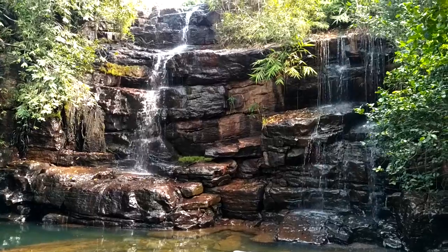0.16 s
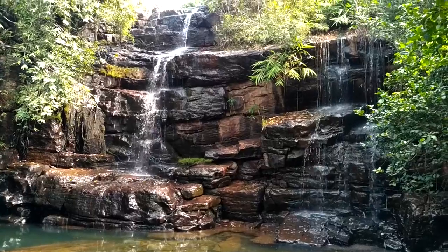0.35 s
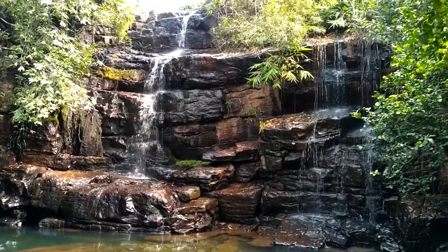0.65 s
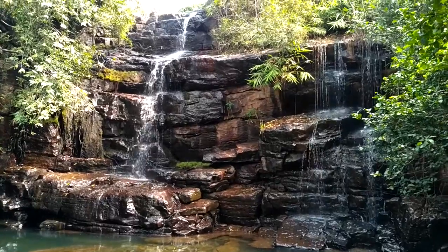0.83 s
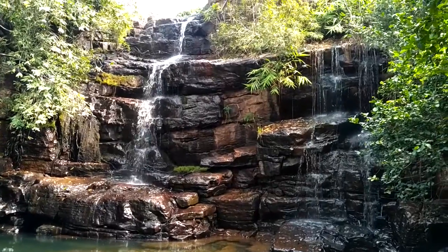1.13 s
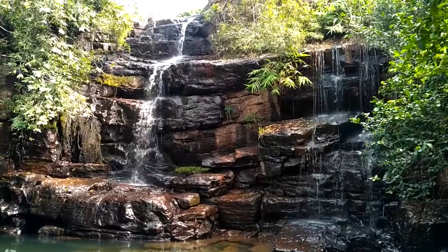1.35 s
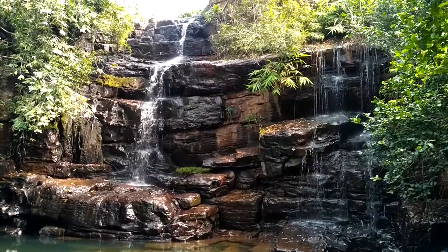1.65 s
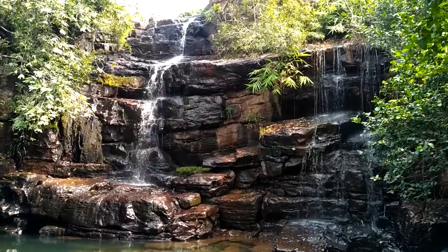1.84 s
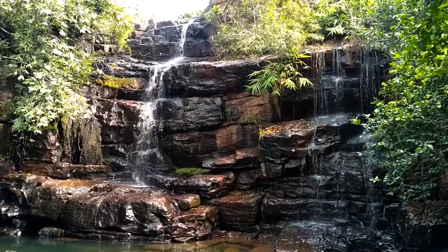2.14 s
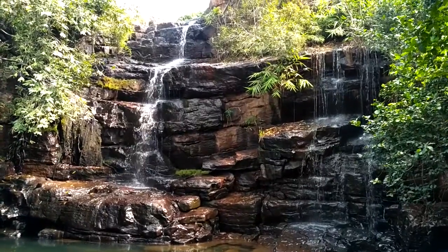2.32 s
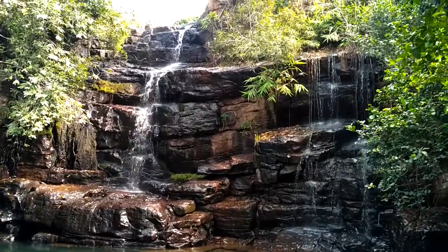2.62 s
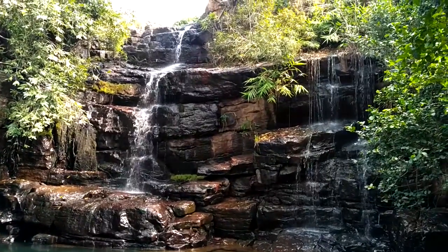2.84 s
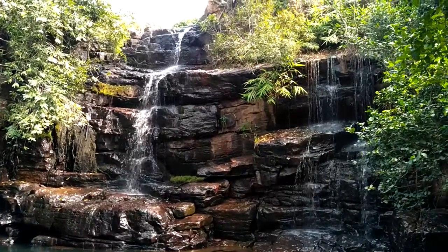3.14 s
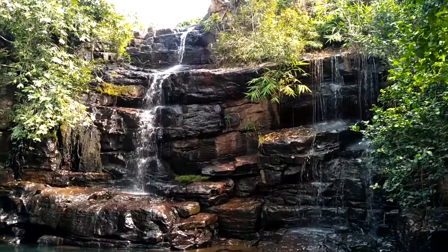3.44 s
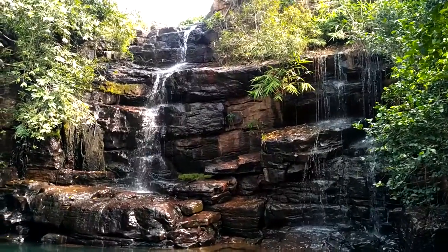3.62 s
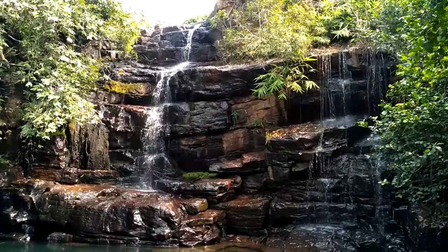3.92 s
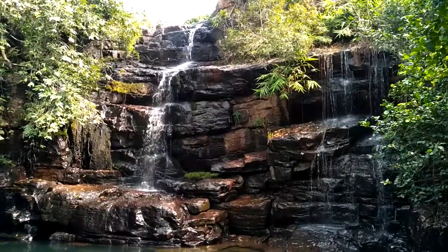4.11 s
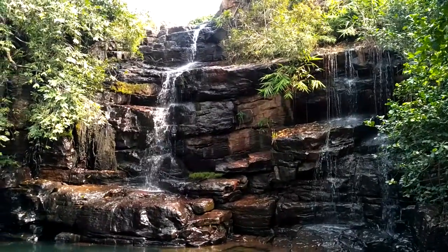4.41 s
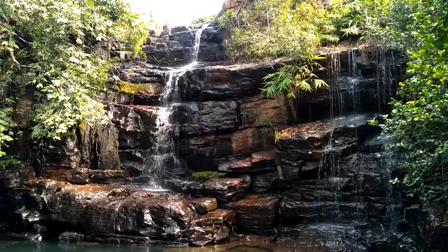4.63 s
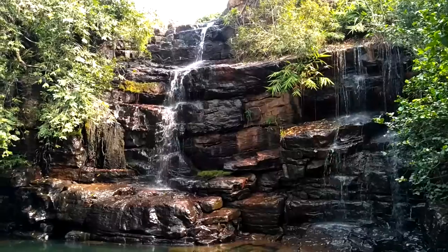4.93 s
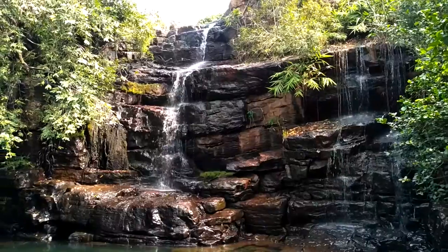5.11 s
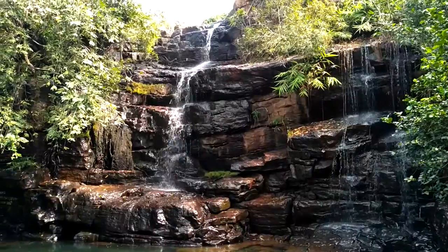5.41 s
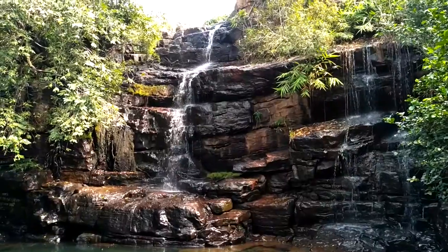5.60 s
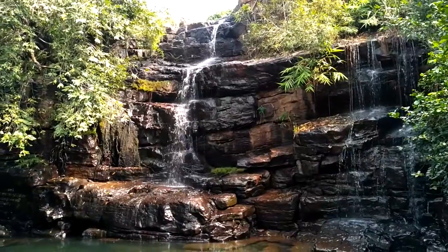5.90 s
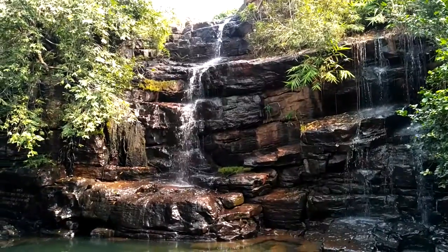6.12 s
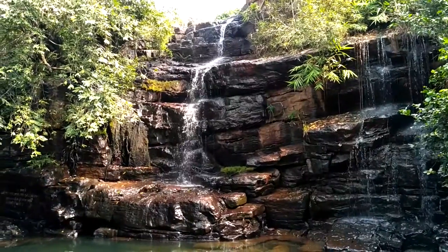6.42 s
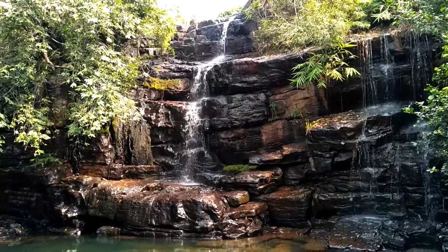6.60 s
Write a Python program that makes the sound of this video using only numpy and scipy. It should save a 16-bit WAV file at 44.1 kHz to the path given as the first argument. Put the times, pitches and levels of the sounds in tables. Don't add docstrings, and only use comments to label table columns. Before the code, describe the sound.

A small waterfall breaks on rock ledges into a pool, heard across the water by a thin, bright mono microphone. Dense spray hiss fades in quickly, then at about half a second sinks to a faint whisper with barely audible splats and plops. Around 4.4 seconds the level jumps back to full, revealing hard drop clicks on near stone, side-trickle gurgles, bubbles and soft wind bumps.

```python
import sys
import numpy as np
from scipy import signal
from scipy.fft import rfft, irfft, next_fast_len
from scipy.io import wavfile
from scipy.ndimage import uniform_filter1d

SR = 44100
rng = np.random.default_rng(int(sys.argv[2]) if len(sys.argv) > 2 else 0)


def log_audio(samples):
    frames = np.atleast_2d(samples).T
    limited = np.clip(frames, -1, 1)
    pcm = np.round(limited * 32767).astype(np.int16)
    wavfile.write(sys.argv[1], SR, pcm)


def invert_db(x):
    u = np.asarray(x, float) / 20
    return 10 ** u


N = 297675


def unit(x):
    return x / np.sqrt(np.mean(x ** 2) + 1e-20)


def curve(rows):
    seconds, values = np.transpose(rows)
    return np.interp(np.arange(N) / SR, seconds, values)


def filtered(x, response):
    size = next_fast_len(len(x) + 8192)
    hz = np.fft.rfftfreq(size, 1 / SR)
    return irfft(rfft(x, size) * response(hz), size)[:len(x)]


def coloured(x, spectrum):
    points_hz, points_db = np.transpose(spectrum)
    return unit(filtered(x, lambda hz: invert_db(np.interp(np.log(hz + 1), np.log(points_hz), points_db))))


# centre in Hz, width in Hz, lift in dB.
HOUSING = [(1690, 166, 6.5), (2463, 260, 3.5), (3500, 310, 4), (4534, 120, 4.5), (11240, 1260, 4)]


def housing(hz):
    return invert_db(sum(lift_db * np.exp(-((hz - centre) / width) ** 2) for centre, width, lift_db in HOUSING))


def patchy(patch_db, surge_db, bins, fade, even_hz):
    hz, _, cells = signal.stft(rng.standard_normal(N + 2 * 256), SR, nperseg=256)
    patches = uniform_filter1d(rng.standard_normal(cells.shape), bins, 0)
    kicks = np.vstack([patches, rng.standard_normal(cells.shape[1])])
    kicks = kicks / kicks.std(1, keepdims=True)
    kicks = np.maximum(kicks - 0.8, 0) ** 2
    field = signal.lfilter([1], [1, -fade], kicks - kicks.mean())
    field = np.tanh(field / field.std() / 3) * 3
    depth_db = patch_db / np.sqrt(1 + (hz[:, None] / even_hz) ** 2)
    gain_db = depth_db * field[:-1] + surge_db * field[-1]
    return signal.istft(cells * invert_db(gain_db), SR, nperseg=256)[1][:N]


def droplets(count, centre_hz, octaves, cycles, scatter_db):
    start = (rng.random(count) * N).astype(int)
    size = invert_db(scatter_db * np.minimum(rng.exponential(size=count), 3.5))
    hz = centre_hz * 2 ** (octaves * rng.standard_normal(count))
    hz = np.clip(hz, centre_hz / 4, SR / 3)
    turns = hz[:, None] * np.arange(512) / SR
    ring = np.sin(2 * np.pi * turns * (1 + 0.095 * turns / cycles))
    envelope = np.exp(-turns / cycles) * (1 - np.exp(-turns))
    grains = size[:, None] * ring * envelope
    at = start[:, None] + np.arange(512)
    return np.bincount(at.ravel(), grains.ravel(), N + 512)[:N]


def bursts(rows, width, edge, fall, extra_db):
    out = np.zeros(N + 2 * SR)
    for s, hz, db, ms in rows:
        span = next_fast_len(round(ms * SR / 200))
        f = np.fft.rfftfreq(span, 1 / SR)
        response = housing(f) * np.exp(-(np.log2((f + 1) / hz) / width) ** 2)
        band = irfft(rfft(rng.standard_normal(span)) * response, span)
        u = np.arange(span) / (ms * SR / 1000)
        fade_out = 1 - np.arange(span) / span
        burst = band * np.tanh(u / edge) / (1 + u ** fall) * fade_out
        loudness = np.sqrt(np.mean(burst[u < 1] ** 2))
        out[round(s * SR):][:span] += invert_db(db + extra_db) * burst / loudness
    return out[:N]


# time in seconds, level in dB.
WIND = [(0, -76), (1, -79.5), (2, -78.5), (3, -73), (3.5, -82), (4, -83), (4.5, -75.5), (5.4, -78.5),
        (6.4, -69), (6.75, -77)]
# frequency in Hz, level in dB.
RUMBLE = [(15, -47), (30, -16), (60, -4), (120, -0.5), (170, -5), (300, -58), (600, -120)]
# start in seconds, centre in Hz, peak in dB, length in ms.
BUMPS = [(3.003, 107, -58, 120), (3.772, 126, -58, 190), (4.0, 124, -61, 59), (5.0, 117, -63, 70),
         (5.12, 121, -64, 38), (5.36, 70, -66, 80), (5.43, 117, -58, 60), (6.05, 80.6, -64, 52),
         (6.26, 113, -66, 50), (6.36, 110, -63, 100), (6.45, 70, -67, 34), (6.56, 90, -67, 77),
         (4.65, 120, -67, 40), (3.55, 160, -67, 110)]


def wind():
    gusts = patchy(0.1, 2.2, bins=1, fade=0.85, even_hz=500)
    rumble = invert_db(curve(WIND)) * coloured(gusts, RUMBLE)
    return rumble + bursts(BUMPS, width=0.34, edge=0.13, fall=2.9, extra_db=-3.5)


# start in seconds, centre in Hz, peak in dB.
TRICKLES = [(2.333, 383, -55), (2.676, 1900, -43), (2.737, 1700, -44.5), (2.89, 950, -52),
            (3.105, 270, -56), (3.763, 151, -62), (4.241, 850, -48.5), (4.411, 1300, -50),
            (4.527, 680, -59), (4.574, 604, -58), (4.695, 6050, -39), (4.76, 6210, -39), (4.801, 1900, -47),
            (4.95, 4280, -42), (5.016, 6100, -37), (5.086, 2130, -44), (5.125, 2420, -45),
            (5.16, 1900, -45), (5.164, 3780, -42.5), (5.273, 3070, -43), (5.463, 212, -59),
            (5.684, 350, -54), (5.689, 1900, -44), (5.801, 3020, -45), (6.131, 3100, -43),
            (6.257, 1080, -55), (6.264, 2200, -47), (6.517, 3930, -38), (6.53, 880, -55.5),
            (6.57, 2770, -42)]


def gurgles(count):
    when, where, size = rng.random((count, 3)).T
    hz = 441 * 2 ** (3.99 * where)
    faint_db = -56 + 5 * np.log2(hz / 1000)
    faint_db = faint_db + 2.5 * (2 * size - 1)
    rows = TRICKLES + list(zip(when * N / SR, hz, faint_db))
    return [(s, f, db, 16.3 * (1000 / f) ** 0.25) for s, f, db in rows]


# start in
# seconds, centre in Hz, peak in dB, length in ms.
SOFT_RUSHES = [(.65, 1810, -46, 30), (1.25, 2100, -45, 37), (1.49, 1600, -52, 30), (1.53, 2140, -54, 23),
               (1.565, 2600, -47, 25), (5.7, 296, -59.5, 70), (5.8, 280, -61.5, 63), (2.69, 1570, -52, 20),
               (3.4, 1750, -43, 17), (3.505, 1700, -45, 16), (3.835, 1690, -44, 18), (3.921, 1540, -51, 18),
               (4.925, 2370, -44, 20), (5.478, 4000, -41, 16), (5.88, 3600, -39, 7.8), (5.91, 3500, -45.5, 35),
               (5.909, 1500, -48, 15), (6.05, 1740, -45, 33), (6.296, 2490, -43.5, 31)]


def trickles():
    return bursts(SOFT_RUSHES + gurgles(count=70), width=0.33, edge=0.17, fall=1.0, extra_db=-4.5)


# start in seconds, peak in dB, length in ms.
HOLLOW = [
    (3.388, -42, 13),
    (4.107, -45, 15),
    (4.243, -28.5, 11),
    (4.709, -40, 14),
    (4.874, -47, 27),
    (4.902, -45.5, 27),
    (6.067, -45, 9.3),
    (6.095, -45.5, 10),
]
# start in seconds, pitch in Hz, peak in dB.
PLOPS = [(.73, 1520, -47), (.936, 1000, -50.5), (1.191, 1340, -45), (1.197, 624, -61), (1.239, 1350, -49),
         (1.458, 1260, -51), (1.711, 1134, -50), (2.095, 1080, -53), (2.135, 1220, -54), (2.516, 940, -51),
         (2.859, 950, -56), (2.942, 990, -52), (3.505, 1140, -54), (3.786, 854, -55.5), (4.001, 1000, -53),
         (4.322, 714, -58), (4.468, 634, -59), (4.653, 1105, -53), (4.748, 1910, -43.5), (4.827, 594, -69),
         (5.014, 810, -58), (5.331, 700, -56), (5.388, 796, -54.5), (5.681, 1080, -54.5),
         (5.822, 1836, -42.5), (5.879, 1380, -49), (5.93, 790, -53), (6.171, 2240, -47.5)]
# start in seconds, pitch in Hz, peak in dB, length in ms.
GLUGS = [(2.74, 424, -58, 18), (2.858, 196, -62, 67), (3.178, 334, -48, 16), (3.466, 382, -55, 24),
         (3.833, 420, -60, 31), (4.798, 360, -60, 23), (4.912, 380, -57, 21), (5.938, 303, -56.5, 31),
         (6.177, 300, -56.5, 41), (6.27, 457, -58.5, 25), (6.677, 299, -52.5, 115)]


def bubbles():
    hollow = [(s, 1740, db, ms) for s, db, ms in HOLLOW]
    plain = [(s, hz, db, 15.8) for s, hz, db in PLOPS]
    return hollow + plain + GLUGS


def plops():
    out, t = np.zeros(N + SR), np.arange(SR // 5) / SR
    for s, hz, db, ms in bubbles():
        u = t / (ms / 1000 * 0.19)
        swell = u ** 2 * np.exp(2 - 2 * u)
        ring = np.sin(2 * np.pi * hz * t * (0.963 + 0.0087 * u))
        out[round(s * SR):][:len(t)] += invert_db(db + 4) * swell * ring
    return out[:N]


def froth():
    return bursts(bubbles(), width=0.23, edge=0.33, fall=2.3, extra_db=-5.5)


# delay in seconds, level in dB.
LEDGES = [(.0055, -11.5), (.011, -10), (.019, -5.5), (.032, -13), (.045, -16), (.061, -19)]


def ledges(x):
    return x + sum(invert_db(db) * np.pad(x, (round(s * SR), 0))[:N] for s, db in LEDGES)


# start in seconds, centre in Hz, peak in dB, length in ms.
SPLATS = [(.21, 6100, -32.5, 8.4), (.862, 4420, -35, 9), (.997, 3470, -40, 13), (1.189, 2840, -35.5, 23),
          (1.202, 5530, -35.5, 23), (1.248, 3690, -37, 9.8), (1.598, 2800, -34.5, 9),
          (2.143, 5300, -34.5, 30), (3.175, 5960, -39, 18), (3.782, 5430, -40, 19), (3.844, 2860, -37, 17),
          (3.915, 4650, -34.5, 14), (4.41, 4680, -36.5, 7.3), (4.412, 2250, -40, 20),
          (4.539, 4270, -38, 15), (4.612, 6460, -31, 13), (4.8, 6500, -36, 16), (5.098, 5560, -34.5, 11),
          (5.467, 3700, -33.5, 14), (5.589, 3940, -34.5, 11), (5.719, 2800, -39.5, 10),
          (5.774, 5170, -36.5, 9.7), (5.88, 2820, -36.5, 27), (5.978, 2630, -40.5, 9.4),
          (6.21, 2470, -42, 7.2), (6.291, 3570, -32.5, 24), (6.512, 7340, -33.5, 14),
          (6.58, 4300, -36.5, 21), (6.623, 3720, -38.5, 17)]
# start in seconds, centre in Hz, peak in dB.
SPITS = [(.151, 11800, -32), (.275, 11260, -34), (.313, 12080, -32), (1.052, 12150, -34),
         (5.019, 10800, -28), (5.17, 8190, -36), (5.294, 8300, -27.5), (6.167, 10700, -28.5),
         (6.328, 8970, -35), (6.537, 11070, -33), (6.669, 10660, -32)]


def splats():
    spits = [(s, hz, db, 10.5) for s, hz, db in SPITS]
    return bursts(SPLATS + spits, width=0.36, edge=0.15, fall=1.5, extra_db=-6.5)


# start in seconds, peak in dB.
CRACKS = [
    (4.616, -19),
    (4.804, -22),
    (5.02, -26),
    (6.2952, -23),
]


def cracks():
    out, t = np.zeros(N), np.arange(SR // 200) / SR
    for s, db in CRACKS:
        out[round(s * SR):][:len(t)] += invert_db(db - 60 * t / 0.0024) * np.sin(2 * np.pi * 8500 * t)
    return out


# frequency in Hz, level in dB.
POOL = [(40, -38), (110, -15.5), (195, -8), (295, -.5), (420, -3.5), (540, -12.5), (850, -4), (1160, -7),
        (1500, -0.5), (1950, -25), (3300, -120)]


def pool():
    murmur = coloured(patchy(3.2, 0.46, bins=2, fade=0.97, even_hz=3000), POOL)
    small_bubbles = droplets(count=1200, centre_hz=1293, octaves=0.522, cycles=4.5, scatter_db=2.0)
    return invert_db(-60.5) * murmur + invert_db(-73) * unit(small_bubbles)


# frequency in Hz, level in dB.
SPRAY = [(760, -42), (1300, -25.5), (1600, -13.5), (5300, -4), (11000, -1), (13500, -2), (15750, -6)]
# time in seconds, level in dB.
TOP_BAND = [(0, 2), (.5, 3), (1, 3), (4, 2.5), (4.5, 2.5), (5.4, 1.5), (5.8, 1), (6.1, 0.5), (6.4, -0.5),
            (6.75, 0.5)]


def spray():
    top_db = curve(TOP_BAND)
    fizz = droplets(count=6000, centre_hz=6850, octaves=0.777, cycles=2.5, scatter_db=4.0)
    rush = patchy(2.6, 0.7, bins=5, fade=0.855, even_hz=3500)
    white = unit(rush) + invert_db(-12.5) * unit(fizz)
    hiss = invert_db(-35) * unit(filtered(coloured(white, SPRAY), housing))
    top_band = filtered(hiss, lambda hz: 1 / (1 + (13300 / (hz + 1)) ** 16))
    sizzle = filtered(hiss, lambda hz: np.exp(-((hz - 11000) / 900) ** 2))
    return hiss + (invert_db(top_db) - 1) * top_band + (invert_db(-0.9 * top_db) - 1) * sizzle


def sloshed(water):
    period_s, crest_s, depth_db, mean_db = 0.687, 2.74, 0.44, -1.5
    middle = filtered(water, lambda hz: np.exp(-(np.log2((hz + 1) / 1900) / 0.98) ** 2))
    rock = np.cos(2 * np.pi * (np.arange(N) / SR - crest_s) / period_s)
    return water + (invert_db(mean_db + depth_db * rock) - 1) * middle


def waterfall():
    return invert_db(0.5) * sloshed(spray() + pool())


def scene():
    background = wind() + trickles()
    pool_bubbles = ledges(plops()) + froth()
    mono = background + pool_bubbles + splats() + cracks() + waterfall()
    return np.tile(mono, (2, 1))


# frequency in Hz, level in dB.
OWN_NOISE = [(15, -6), (50, -1), (100, -26), (300, -42), (600, -120)]


def amplifier_noise():
    return invert_db(-104) * coloured(rng.standard_normal(N), OWN_NOISE)


def gains():
    t = np.arange(N) / SR
    hold_db, duck_db, low_step_db = -2.5, -20, -15
    opening = np.interp(t, [0, 0.28], invert_db([-20.5, hold_db]))
    opening = opening * np.where(t < 0.0096, invert_db(-4.5), 1)
    sink_db = np.interp(t, [0.556, 0.556 + 0.073], [0, duck_db - hold_db])
    step_db = np.interp(t, [0.53, 0.53 + 0.041], [0, low_step_db - hold_db])
    treble = opening * invert_db(sink_db)
    low = opening * invert_db(np.minimum(sink_db, step_db))
    back = np.clip((t - 4.3895) / 0.0085, 0, 1)
    return treble * (1 - back) + back, low * (1 - back) + back


def band_limit(x):
    return signal.sosfilt(signal.butter(12, 16850, fs=SR, output="sos"), x)


def record(dry):
    treble_gain, low_gain = gains()
    low = filtered(dry[0], lambda hz: hz < 5050)
    treble = dry[0] - low
    mono = low * low_gain + treble * treble_gain + amplifier_noise()
    mono = filtered(mono, lambda hz: hz < 15750)
    return band_limit(np.array([mono, mono]))


dry = scene()
out = record(dry)
log_audio(out)
```